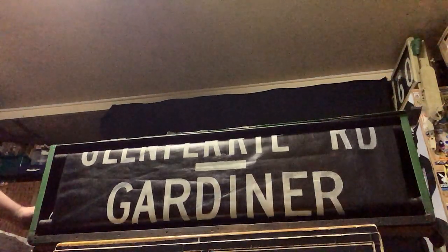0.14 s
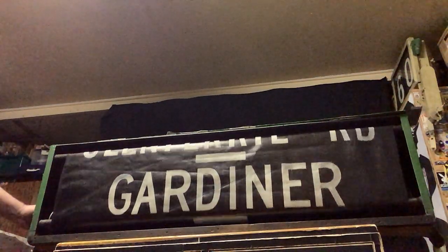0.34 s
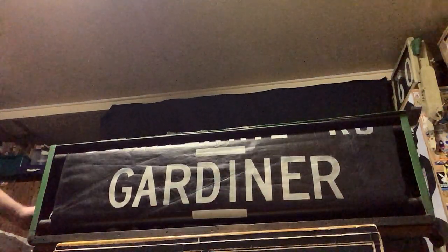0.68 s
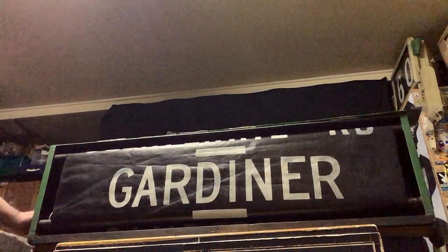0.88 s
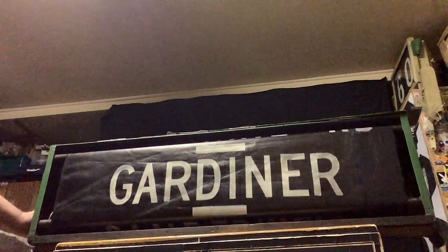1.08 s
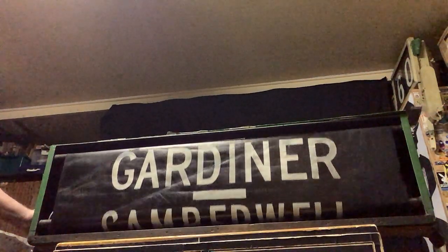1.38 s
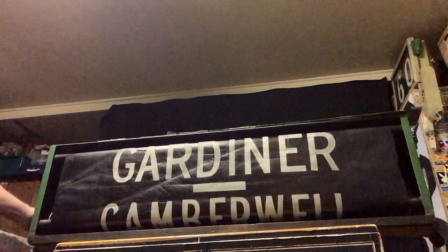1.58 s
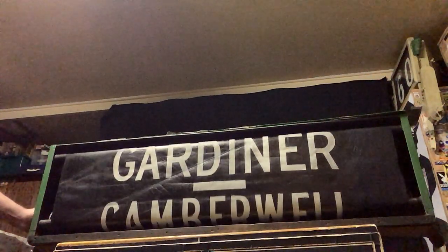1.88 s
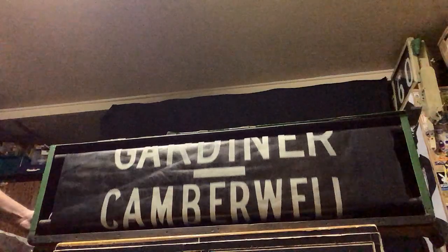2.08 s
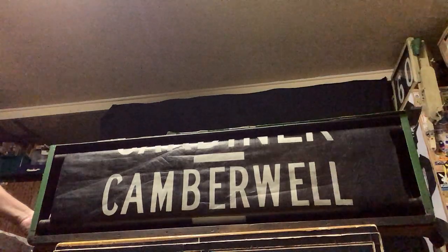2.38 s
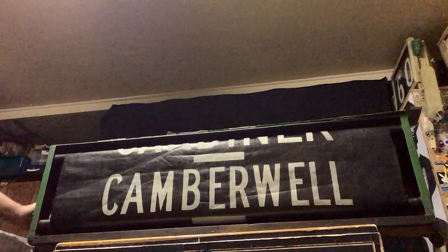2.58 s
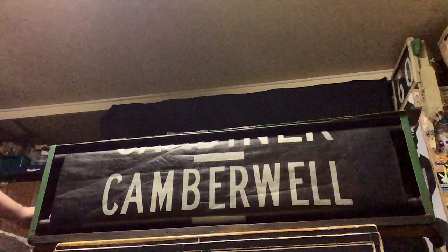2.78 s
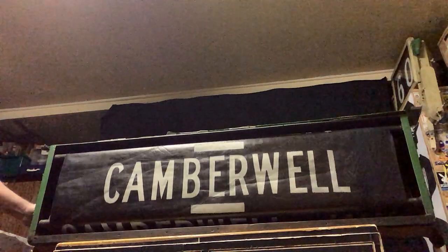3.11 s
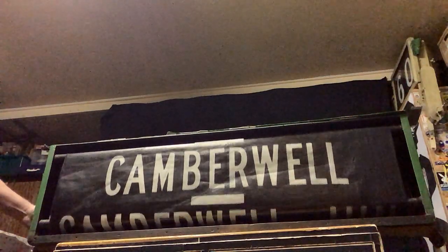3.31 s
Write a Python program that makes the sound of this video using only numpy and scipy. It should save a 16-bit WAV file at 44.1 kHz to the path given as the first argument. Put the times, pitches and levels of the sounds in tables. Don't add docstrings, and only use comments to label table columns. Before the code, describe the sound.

A cloth roller blind is hand-wound in four rustling, scraping strokes with ratcheting clicks and knocks.

```python
import sys
import numpy as np
from scipy import signal
from scipy.io import wavfile
from scipy.ndimage import uniform_filter1d

SR = 44100
rng = np.random.default_rng(int(sys.argv[2]) if len(sys.argv) > 2 else 0)


def log_audio(samples):
    frames = np.atleast_2d(samples).T
    limited = np.clip(frames, -1, 1)
    pcm = np.round(limited * 32767).astype(np.int16)
    wavfile.write(sys.argv[1], SR, pcm)


def decibels_to_gain(level_db):
    exponent = np.asarray(level_db, float) / 20
    return 10 ** exponent


N = 152145

# start_s, winding_effort_db, cloth_tension_db, roller_load_db
HAND_STROKES = [
    [(0, -60, -26, 4), (.032, -53, -9, 1), (.14, -48, -2, 1), (.28, -44.5, -3.5, 1.5),
     (.36, -46, -2.5, 1.5), (.45, -49, -2, -1), (.545, -49, -1.5, 3.5), (.595, -65.5, -4, 4.5)],
    [(.934, -60, -9, 7), (.946, -56, -10.5, -3), (1.118, -47, -2.5, 0), (1.21, -49, -1.5, 3),
     (1.3, -47, 1.5, 3), (1.42, -45, -0.5, -1), (1.552, -49, -2.5, 2), (1.588, -65.5, 3, 6)],
    [(1.764, -74, -5, 1), (1.804, -62, -11, 6.5), (1.944, -45.5, 1, 0.5), (2.05, -47.5, 4, 5.5),
     (2.15, -45.5, 1, 4), (2.25, -46.5, -0.5, 4), (2.345, -46.5, 2, 0.5), (2.414, -63, -0.5, 5)],
    [(2.762, -78, -9, -7), (2.787, -59, -9.5, 3.5), (2.855, -48.5, -3, 4), (3, -49.5, 1, 1.5),
     (3.1, -50, -2.5, 1.5), (3.2, -46.5, -2.5, 0), (3.277, -47.5, -2.5, 1.5), (3.34, -43, 1, 3.5),
     (3.405, -58, -2, 4.5)],
]
# start_s, effort_db, tension_db, load_db
SLACK_CLOTH = [
    (2.425, -76, -9, 2.4),
    (2.45, -58.5, -21, 3.7),
    (2.51, -60, -26, 3.6),
    (2.56, -81, -32, 14.6),
    (2.64, -93, -15, 4),
]
# start_s, force_db, cloth_jerk_db, crack_hz
GEAR_TEETH = [(0.035, -54, 5, 5000), (0.138, -31, 3, 6000), (0.263, -26, 4.5, 4750),
              (0.38, -27.5, 4.5, 4630), (0.536, -38, -3.5, 4430), (0.9455, -40, 1.5, 4930),
              (1.1355, -29.5, 3, 5800), (1.253, -24, 6.5, 4460), (1.3335, -23.5, 4.5, 5000),
              (1.4157, -25.5, 3, 4700), (1.5306, -33.5, 3, 6700), (1.8866, -47, 1, 3900),
              (1.943, -29, 4.5, 4270), (2.0141, -24.5, 2.5, 4640), (2.082, -24, 4, 6000),
              (2.156, -27, 3, 4700), (2.2399, -24.5, 3.5, 4370), (2.3359, -35, 2, 4500),
              (2.913, -31, 5.5, 4200), (3.0358, -28.5, 6, 4900), (3.184, -31, 4, 6000),
              (3.3157, -26.5, 0.5, 4800)]
# start_s, force_db, top_hz, rattle_s, weight_db
CRANK_KNOCKS = [(.024, -48, 2000, 0.04, 6), (.615, -38.5, 4500, 0.027, 2), (.643, -52.5, 5100, 0.032, 8),
                (.808, -53, 3000, 0.034, -25), (.871, -51, 2010, 0.012, -2), (.876, -46.5, 4500, 0.015, 4),
                (.943, -48.5, 3000, 0.018, 6), (1.594, -35.5, 4230, 0.027, 1.5),
                (1.623, -49.5, 2500, 0.012, 1), (1.766, -57, 1500, .01, 0), (1.773, -44.5, 5300, 0.03, 2),
                (2.421, -41.5, 5200, 0.012, -3), (2.72, -64, 740, 0.014, 10),
                (3.4145, -45.5, 5000, .008, 11), (3.431, -37, 5260, 0.015, 0)]
# start_s, force_db, lowest_part_db
METAL_JINGLES = [
    (0.622, -58, -12),
    (0.875, -61, -6),
    (1.61, -53.5, -7),
    (3.4115, -56, 1),
]
# start_s, pitch_hz, level_db, t60_s
PANEL_RINGS = [(.0245, 1310, -42, .035), (.024, 320, -51.5, 0.13), (.616, 520, -43, 0.079),
               (.616, 979, -46, 0.058), (.616, 1460, -41, 0.058), (.616, 4400, -61, .05),
               (.8085, 520, -64, 0.18), (.8085, 936, -61, 0.12), (0.83, 1183, -62.5, .1),
               (.8085, 2100, -63, 0.087), (.876, 441, -50, 0.13), (.876, 658, -48.5, 0.063),
               (.876, 1566, -50, 0.055), (.875, 4010, -57.5, 0.064), (1.596, 280, -45, 0.14),
               (1.596, 500, -42.5, .12), (1.594, 810, -41, 0.04), (1.596, 980, -44, .08),
               (1.58, 1222, -40.5, 0.078), (1.7, 4000, -48, .02), (1.772, 488, -44, 0.062),
               (1.773, 935, -54, .08), (1.774, 3224, -52, 0.032), (1.773, 3900, -53, 0.038),
               (2.422, 957, -46, 0.096), (2.421, 1308, -50, 0.067), (2.53, 246, -54, 0.22),
               (2.51, 140, -54, 0.24), (2.47, 1200, -52, 0.096), (2.48, 560, -51.5, 0.13),
               (2.72, 516, -64, .08), (2.7, 253, -59, 0.2), (3.4145, 620, -46, 0.053),
               (3.4145, 899, -44, 0.044), (3.4145, 3832, -42, 0.026), (3.431, 320, -48, 0.064),
               (3.432, 942, -43.5, .12), (3.432, 1300, -50, 0.11), (3.431, 2800, -45, .05)]
# frequency_hz, level_db
CLOTH_COLOUR = [(410, -36.5), (700, -5.5), (850, -13), (1560, -4), (2950, -4.5), (3450, -9), (3970, -9),
                (8880, -10), (13000, -12), (15500, -17)]
# frequency_hz, level_db
ROLLER_COLOUR = [(18, -45), (30, -43), (52, -15.5), (96, -6), (144, -3.5), (183, -17), (342, 2.5),
                 (759, -8), (900, -6.5), (1170, -35), (1980, -120)]
# frequency_hz, level_db
KNOCK_COLOUR = [(300, -10.5), (440, -1), (750, 1), (1000, -2.5), (1400, -2), (2300, -7.5), (3000, -13),
                (6000, -11.5)]
# frequency_hz, level_db
SLUMP_COLOUR = [(50, -19), (110, 2), (180, -8), (260, -6.5), (550, -11), (1200, -20.5)]
# pitch_hz, width_hz, level_db
BOX_MODES = [(98, 150, 2), (258.6, 30, 9.5), (342, 45, -2), (441, 61, -1.5), (532, 136, 6.5), (958, 98, 4),
             (1243, 240, -4), (1480, 43, -1), (2730, 130, -14)]
# pitch_hz, level_db, t60_s
GEAR_MODES = [(1540, 3, .035), (1770, -3, .025), (3900, 9, .014), (4160, 8, .014), (4420, 9, .012),
              (4750, 14, .012), (5300, 6, .008), (6000, 7, .016), (6700, 4, .01), (8080, 4, .012),
              (9100, -3, .008)]
# pitch_hz, width_hz, level_db
LOOSE_MODES = [(4000, 180, 2), (6950, 570, -8.5), (8260, 480, -3.5), (9500, 700, -6), (10750, 55, 2.5),
               (12500, 180, -13), (12300, 160, -35)]
# frequency_hz, t60_s
ROOM_DECAY = [(60, 0.41), (250, 0.3), (1000, 0.3), (4000, 0.27), (15000, 0.11)]
# frequency_hz, level_db
AIR_COLOUR = [(18, -46), (30, -58), (140, -5), (853, -2), (923, -10), (2300, -11), (6910, -11.5),
              (7480, -10.5), (15600, -14)]
# centre_s, low_hz, high_hz
CHANNEL_HISS = [(.327, 5100, 7600), (.35, 4600, 5800), (.34, 9000, 13100), (1.4, 6800, 8400),
                (1.4, 11600, 13100)]


def evened(x):
    return x / np.sqrt(np.mean(x ** 2) + 1e-20)


def peak(x):
    return x / abs(x).max()


def add(mix, s, sound):
    part = mix[round(s * SR):][:len(sound)]
    part += sound[:len(part)]


def read(points, hz):
    f, value = np.transpose(points)
    return np.interp(np.log(hz + 1), np.log(f + 1), value)


def band(x, low_hz, high_hz, order=2):
    return signal.sosfilt(signal.butter(order, [low_hz, high_hz], "band", fs=SR, output="sos"), x)


def colour(x, points, size=4096):
    hz = abs(np.fft.fftfreq(size, 1 / SR))
    db = read(points, hz)
    db -= 30 * np.maximum(np.log2((hz + 1) / points[-1][0]), 0)
    db -= 18 * np.maximum(np.log2(points[0][0] / (hz + 1)), 0)
    log = np.log(decibels_to_gain(np.maximum(db, -120)))
    taps = np.fft.ifft(np.exp(np.conj(signal.hilbert(log)))).real[:size // 2]
    return signal.oaconvolve(x, taps)[:len(x)]


def resonate(x, modes):
    return sum(decibels_to_gain(db) * signal.lfilter(*signal.iirpeak(hz, hz / max(width, 5), SR), x)
               for hz, width, db in modes)


def wander(hz):
    return evened(signal.lfilter(*signal.butter(1, hz, fs=SR), rng.standard_normal(N)))


def contacts(length_s, per_s, first=1.):
    t = np.arange(4000) / SR
    hits = rng.standard_normal(4000) * (rng.random(4000) < per_s / SR)
    hits *= np.exp(-t / max(length_s, 1e-3))
    return np.concatenate([[first], hits[1:]])


def grains(per_s, spread_db, most):
    strength = decibels_to_gain(spread_db * np.minimum(rng.exponential(1, N), most))
    return strength * (rng.random(N) < per_s / SR) * rng.choice([-1., 1.], N)


def box(x):
    return x + resonate(x, BOX_MODES)


def air():
    hiss = decibels_to_gain(-78.5) * evened(colour(rng.standard_normal(N), AIR_COLOUR))
    return hiss + decibels_to_gain(-76) * evened(band(rng.standard_normal(N), 67, 170))


def room(x):
    out = np.zeros(N)
    turn = np.pi * np.arange(N) / SR * 3.1
    for k in range(3):
        taps = np.zeros(SR // 2)
        at = np.arange(120, len(taps) - 20, 20)
        taps[at + rng.integers(0, 20, len(at))] = rng.choice([-1., 1.], len(at))
        hz, t, z = signal.stft(taps, SR, nperseg=256)
        decay = decibels_to_gain(-60 * t / read(ROOM_DECAY, hz)[:, None])
        tail = signal.istft(z * decay, SR, nperseg=256)[1]
        share = np.sqrt(2 / 3) * np.cos(turn + k * np.pi / 3)
        out += signal.fftconvolve(x * share, tail / np.linalg.norm(tail))[:N]
    return out


def panels():
    rise_s = 0.0017
    out, t = np.zeros(N), np.arange(9000) / SR
    for s, hz, db, t60 in PANEL_RINGS:
        swell = decibels_to_gain(db - 60 * t / t60) * (1 - np.exp(-t / rise_s))
        add(out, s, swell * np.sin(2 * np.pi * (hz * t + rng.random())))
    return out


def jingles():
    out, t = np.zeros(N), np.arange(4000) / SR
    for s, db, low_db in METAL_JINGLES:
        shake = contacts(0.064, 6800) * np.exp(-(t / 0.052) ** 4)
        modes = [(hz, width, d + low_db * (hz < 5000)) for hz, width, d in LOOSE_MODES]
        fizz = band(shake, 9000, 11400)
        add(out, s, decibels_to_gain(6 + db) * peak(resonate(shake, modes) + decibels_to_gain(-18) * fizz))
    return out


def knocks():
    knock_db, knock_rise_s = 0.5, 0.0019
    thud_s, thud_rise_s = 0.028, 0.028
    out, t = np.zeros(N), np.arange(9000) / SR
    for s, db, top_hz, rattle_s, weight_db in CRANK_KNOCKS:
        hits = np.pad(contacts(rattle_s, 6000), (0, 5000))
        hits *= np.minimum(t / knock_rise_s + 0.54, 1)
        knock = colour(band(hits, 124, top_hz, order=4), KNOCK_COLOUR)
        thud = rng.standard_normal(9000) * np.exp(-t / thud_s) * np.minimum(t / thud_rise_s, 1)
        thud = colour(thud, SLUMP_COLOUR)
        add(out, s, decibels_to_gain(knock_db + db) * (peak(knock) + decibels_to_gain(weight_db - 7.5) * peak(thud)))
    return out


def ring(modes, hits, spread_db):
    t = np.arange(8000) / SR
    body = np.zeros(8000)
    for hz, db, t60 in modes:
        luck_db = spread_db * rng.standard_normal()
        body += decibels_to_gain(db + luck_db - 60 * t / t60) * np.sin(2 * np.pi * hz * t)
    return peak(signal.oaconvolve(hits, body))


def gear():
    gear_db = 2
    out = np.zeros(N)
    for s, db, _, crack_hz in GEAR_TEETH:
        hits = contacts(.003, 8000, first=2.6)
        add(out, s, decibels_to_gain(gear_db + db - 8) * ring(GEAR_MODES, hits, 3))
        crack = band(hits, 3270, 8700, order=3) + decibels_to_gain(8) * resonate(hits, [(crack_hz, 900, 0)])
        add(out, s, decibels_to_gain(gear_db + db - 5) * peak(crack))
    return out


def hand():
    release_db_per_s = 498
    t = np.arange(N) / SR
    effort, tension, load = np.full(N, -120.), np.zeros(N), np.zeros(N)
    for stroke in HAND_STROKES[:3] + [SLACK_CLOTH] + HAND_STROKES[3:]:
        s, wind, pull, push = np.transpose(stroke)
        on = t >= s[0]
        effort[on] = np.interp(t[on], s, wind)
        tension[on] = np.interp(t[on], s, pull)
        load[on] = np.interp(t[on], s, push)
        effort[on] -= release_db_per_s * np.maximum(t[on] - s[-1], 0)
    return effort, tension, load


def tooth_jerks():
    rise_s, fall_s = .007, .022
    jerk, t = np.zeros(N), np.arange(9000) / SR
    for s, _, db, _ in GEAR_TEETH:
        add(jerk, s - .004, db * (1 - np.exp(-t / rise_s)) * np.exp(-t / fall_s) * 2)
    return jerk


def rollers(effort, load, jerk):
    rolling = colour(rng.standard_normal(N) * decibels_to_gain(0.59 * wander(38)), ROLLER_COLOUR)
    level_db = -4.5 - 50 + 0.83 * (effort + 47.5) + load + 0.39 * jerk
    return evened(box(rolling)) * decibels_to_gain(level_db)


def thread_snaps():
    top_hz, sharpness = 4800, 6
    snaps, out = grains(900, 3.5, 4), np.zeros(N)
    for k, hz in enumerate(np.geomspace(1100, top_hz, 11)):
        chosen = snaps * (np.arange(N) % 11 == k)
        out += resonate(chosen, [(hz, hz / sharpness, 0)]) * np.sqrt(top_hz / hz)
    return evened(out)


def cloth(effort, tension, jerk):
    cloth_db, tension_hz = -0.5, 2820
    drag = evened(grains(9000, 1.5, 5)) + 0.87 * rng.standard_normal(N)
    drag += decibels_to_gain(-9) * thread_snaps()
    drag = evened(box(colour(drag * decibels_to_gain(0.5 * wander(28)), CLOTH_COLOUR)))
    low = signal.sosfilt(signal.butter(2, tension_hz, fs=SR, output="sos"), drag)
    high = signal.sosfilt(signal.butter(2, tension_hz, "high", fs=SR, output="sos"), drag)
    mid = uniform_filter1d(high, size=3)
    late = uniform_filter1d(jerk, 901, origin=300)
    sheen_db = 0.9 * np.minimum(tension, 0) + 1.4 * np.maximum(tension, 0) + 1.5 * late
    sheen = (high - mid) * decibels_to_gain(sheen_db)
    weave = low * decibels_to_gain(0.47 * jerk) - mid * decibels_to_gain(1.05 * tension + jerk) - sheen
    return decibels_to_gain(cloth_db + effort) * weave


def scene():
    effort, tension, load = hand()
    jerk = tooth_jerks()
    near = panels() + jingles() + knocks() + gear()
    near += rollers(effort, load, jerk) + cloth(effort, tension, jerk)
    return np.tile(near + decibels_to_gain(-13) * room(near) + air(), (2, 1))


def low_pass(x):
    return signal.sosfilt(signal.butter(12, 15700, fs=SR, output="sos"), x)


def record(dry):
    cut = signal.sosfilt(signal.butter(3, 58, "high", fs=SR, output="sos"), dry)
    hiss_s, hiss_db = 0.05, -54
    side, size = np.zeros(N), round(hiss_s * SR)
    for s, low_hz, high_hz in CHANNEL_HISS:
        hiss = band(rng.standard_normal(size), low_hz, high_hz, order=6)
        hiss *= np.sqrt(SR / 8 / (high_hz - low_hz))
        add(side, s - hiss_s / 2, decibels_to_gain(hiss_db) * hiss * np.hanning(size))
    cut = cut + np.array([side, -side])
    edge = signal.firwin(2047, 15680, window=("kaiser", 9), fs=SR)
    mix = signal.oaconvolve(cut, edge[None], "same")
    return low_pass(mix)


dry = scene()
out = record(dry)
log_audio(out)
```